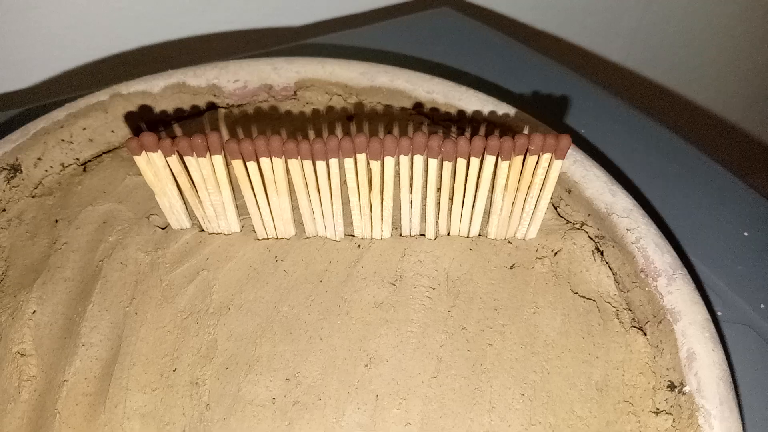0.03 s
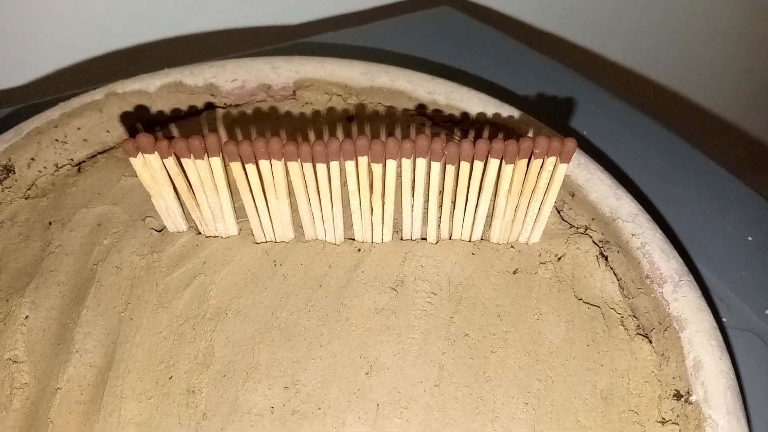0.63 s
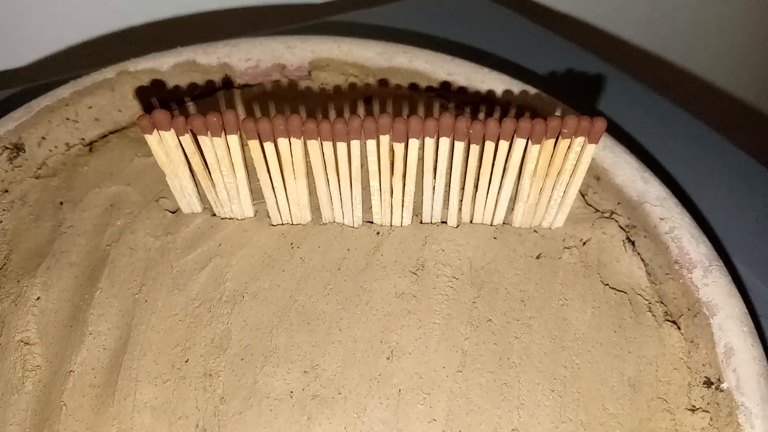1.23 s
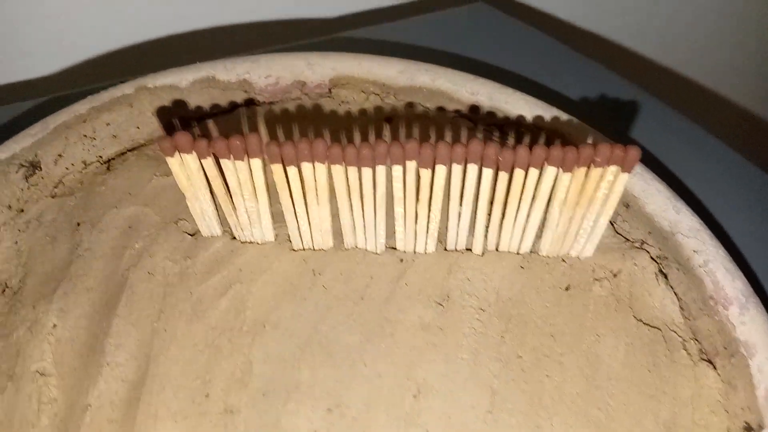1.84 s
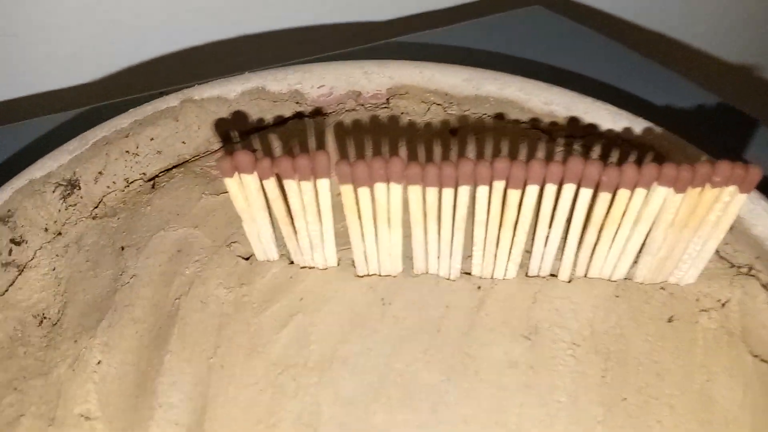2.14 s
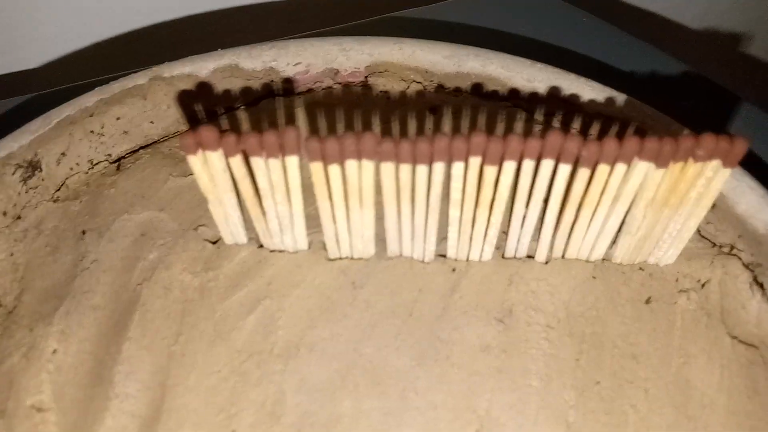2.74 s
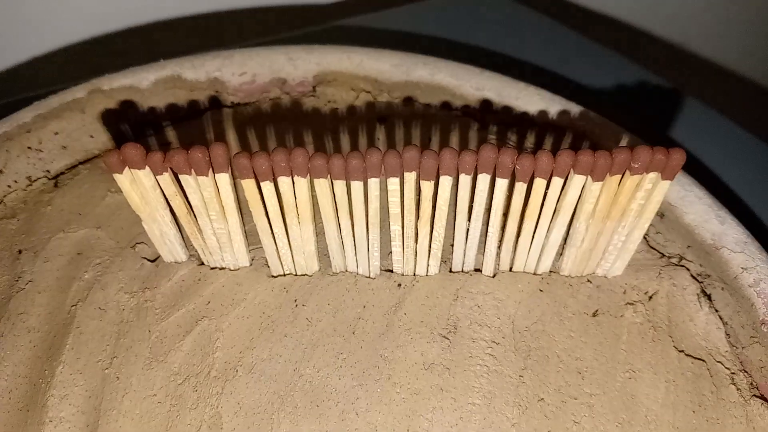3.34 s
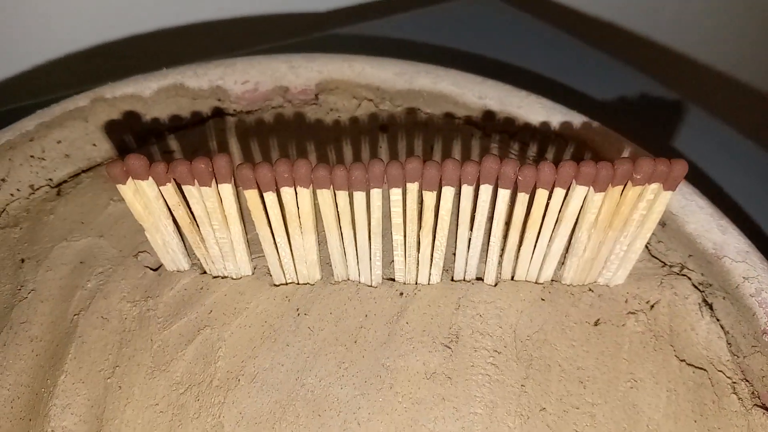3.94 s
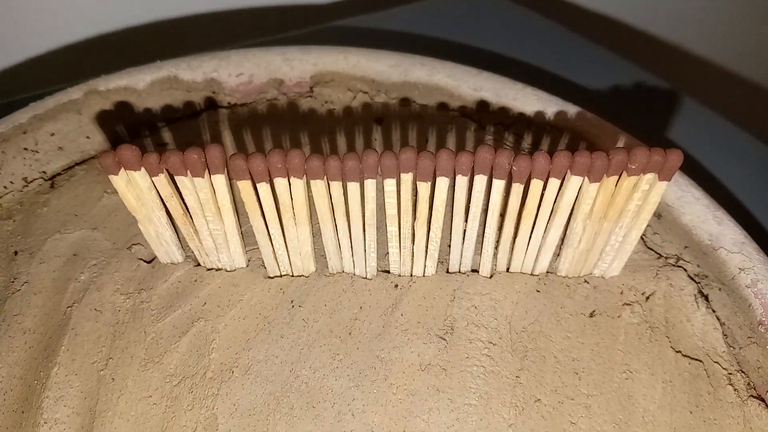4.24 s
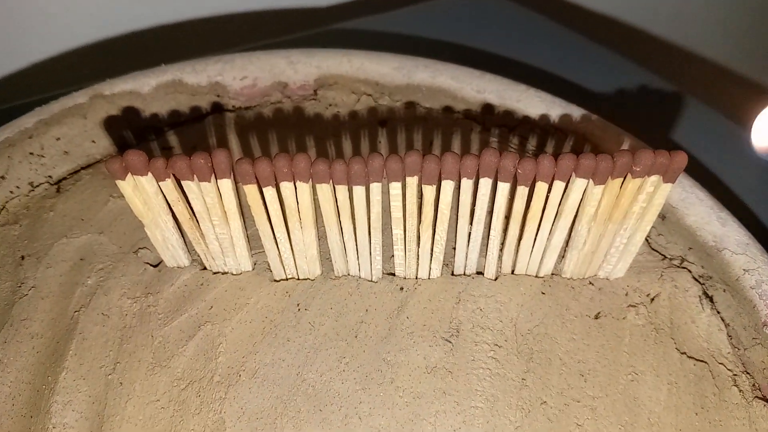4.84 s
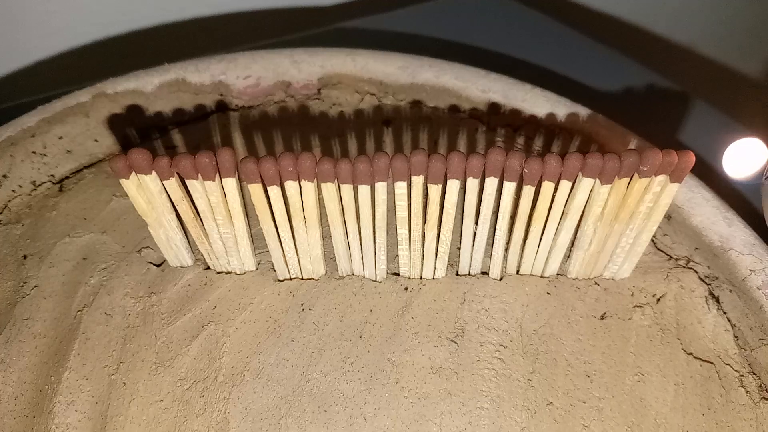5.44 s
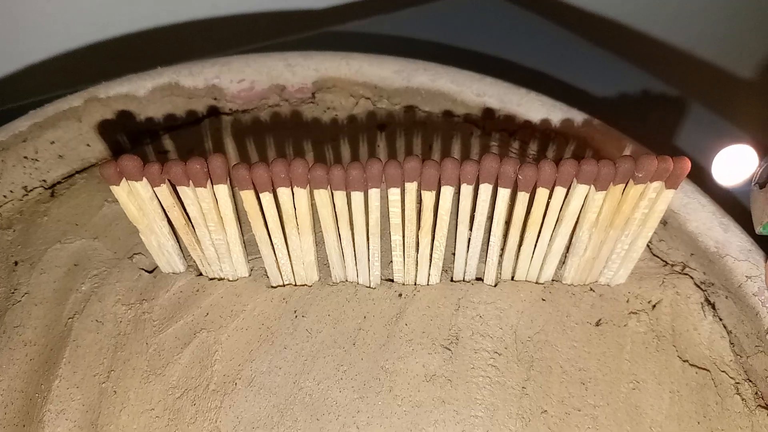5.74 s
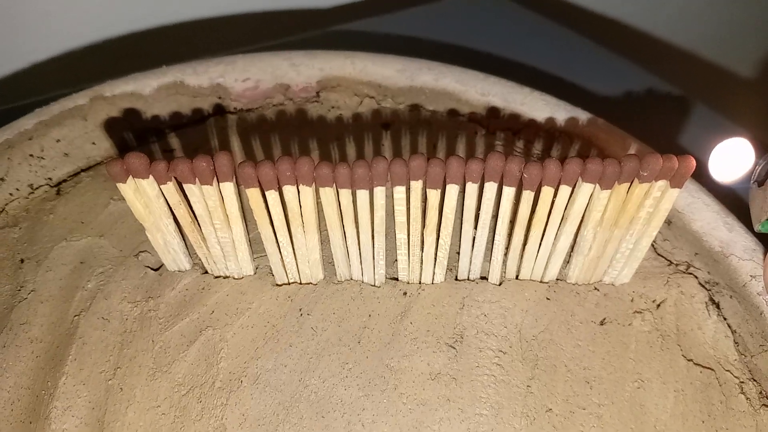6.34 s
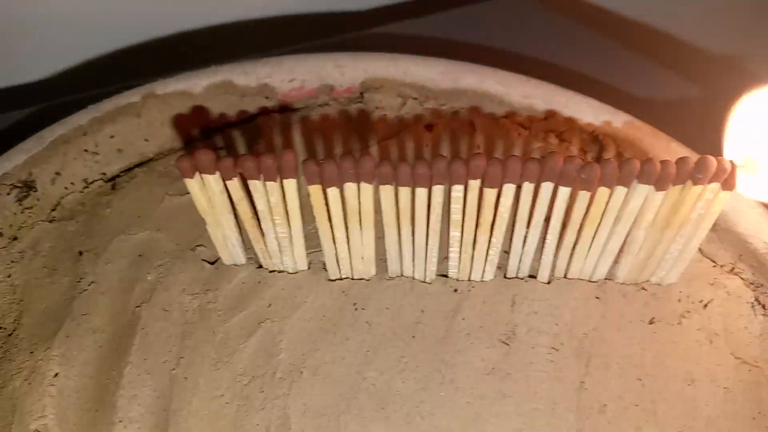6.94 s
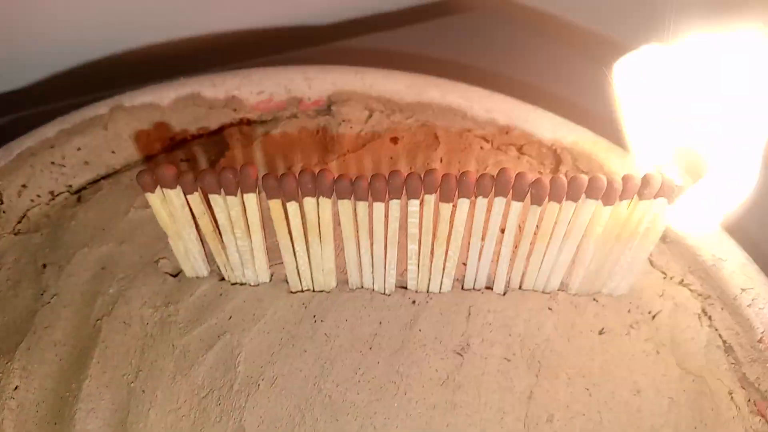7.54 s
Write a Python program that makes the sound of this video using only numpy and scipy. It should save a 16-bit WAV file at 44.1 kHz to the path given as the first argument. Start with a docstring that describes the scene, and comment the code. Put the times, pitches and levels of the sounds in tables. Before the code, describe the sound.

After faint handling ticks and one hard lighter click, match heads catch fire one after another, hissing, spitting and popping close by.

```python
"""A lighter lights a row of matches in a clay dish, close to a phone in a small hard room.
Over room hiss something hoots far off; fingers rub the lighter and its parts tick (from 0.4 s).
The button returns with a rattle (3.5 s), then the striker snaps so hard that the limiter ducks its echo.
More hoots follow. From 6.7 s the heads flare in turn: gas roars and whistles, the melting coating
fizzes and spits, and a few heads pop."""
import sys
import numpy as np
from scipy import signal
from scipy.fft import rfft, irfft, next_fast_len
from scipy.io import wavfile
from scipy.ndimage import uniform_filter1d, minimum_filter1d

SR = 44100
rng = np.random.default_rng(int(sys.argv[2]) if len(sys.argv) > 2 else 0)


def master(y):
    """Save y as 16-bit WAV."""
    cut = np.clip(np.atleast_2d(y).T, -1, 1)
    pcm = np.round(cut * 32767)  # scale
    wavfile.write(sys.argv[1], SR, pcm.astype(np.int16))


N = 334278
TIME = np.arange(N) / SR
RETURN_S, SNAP_S = 3.5245, 3.6743  # lighter: button return, striker

# crack of a match head: (frequency [Hz], level [dB])
CRACK_SPECTRUM = [(200, -19), (1000, -6.5), (2000, -10.5), (3000, -3), (4000, -11.5), (6200, -1),
                  (7000, -3), (9500, -0.5), (12000, -1.5), (16000, -8.5)]
# its ringing: (frequency [Hz], width [Hz], gain [dB])
CRACK_MODES = [(3040, 150, 7), (6240, 370, -2)]


def undb(db):
    """Decibels to gain."""
    return np.exp(np.asarray(db) * np.log(10) / 20)


def unit(x):
    """Scale to rms 1."""
    return x / np.sqrt(np.mean(x ** 2))


def at_hz(hz, rows, axis=1):
    """Table column, interpolated over log frequency."""
    rows = np.array(rows)
    return np.interp(np.log(hz + 1), np.log(rows[:, 0]), rows[:, axis])


def colour(x, spectrum, size=4096):
    """Minimum-phase filter from (frequency [Hz], gain [dB]) rows."""
    gain = undb(at_hz(np.fft.rfftfreq(size, 1 / SR), spectrum))
    cepstrum = irfft(np.log(gain))
    cepstrum[1:size // 2] *= 2
    cepstrum[size // 2 + 1:] = 0
    return signal.fftconvolve(x, irfft(np.exp(rfft(cepstrum))))[:len(x)]


def resonate(x, hz, width_hz):
    """One resonance, gain 1 at centre."""
    return signal.lfilter(*signal.iirpeak(hz, hz / width_hz, fs=SR), x)


def rung(x, modes):
    """Sound plus the resonances it excites."""
    return x + sum(undb(db) * resonate(x, hz, width_hz) for hz, width_hz, db in modes)


def walk(rate_hz):
    """Random drift, spread near 1."""
    steps = rng.standard_normal(8192)
    return np.sqrt(3 / 2) * np.interp(TIME * rate_hz, np.arange(len(steps)), steps)


def fall(t, t60_s):
    """Exponential decay; t60 floored at 1 ms."""
    return np.exp(-np.log(1000) * t / max(t60_s, 1e-3))


def swell(peak_s, rise_s, fall_s):
    """Gaussian rise to 1 and fall."""
    t = TIME - peak_s
    return np.exp(-(t / np.where(t < 0, rise_s, fall_s)) ** 2)


def swells(rows):
    """Power sum of swells: (peak [s], level [dB], rise [s], fall [s])."""
    return np.sqrt(sum((undb(db) * swell(s, rise_s, fall_s)) ** 2 for s, db, rise_s, fall_s in rows))


def add(out, start_s, x):
    """Mix x into out."""
    i = int(start_s * SR)
    out[i:i + len(x)] += x[:N - i]


def grains(rate_hz, spread_db):
    """Random impulses, a few much larger than the rest."""
    sizes = undb(spread_db * np.minimum(rng.exponential(size=N), 5)) * rng.choice([-1, 1], N)
    return unit(sizes * (rng.random(N) < rate_hz / SR))


def burst(spectrum, t60_s, modes=(), rise_s=0.00098, size=4096):
    """Short crack, whitened then coloured; rms 1 over its loudest 3 ms."""
    t = TIME[:size]
    envelope = fall(t, t60_s) * np.clip(t / rise_s, 0, 1)
    bins = rfft(rng.standard_normal(size) * envelope)
    white = irfft(bins / abs(bins)) * np.sqrt(envelope)
    crack = rung(colour(white, spectrum), modes)
    return crack / np.sqrt(uniform_filter1d(crack ** 2, size=132).max())


def air(hiss_db=-68):
    """Quiet room: restless low rumble under smooth hiss."""
    # room noise: (frequency [Hz], level [dB])
    spectrum = [(25, -19), (50, -5.5), (105, 0), (300, -7), (600, -10), (1000, -14.5), (2000, -19),
                (3800, -23), (6000, -28.5), (8500, -35), (16000, -33.5)]
    rumble = unit(resonate(rng.standard_normal(N), 115, 50)) * undb(-80.5 + 2.2 * walk(9.8))
    hiss = unit(colour(rng.standard_normal(N), spectrum)) * undb(hiss_db + 0.2 * walk(2.885))
    return hiss + rumble


def hoots(droop_hz_per_s=150, waver_depth=0.0306):
    """Far wavering notes, drooping in pitch, blurred by echoes on the way."""
    # hoots: (peak [s], pitch [Hz], level [dB], rise and fall [s])
    notes = [(.16, 614, -66, 0.12), (.38, 609, -69, .04), (4.43, 578, -66, .06), (4.59, 597, -58, 0.035),
             (4.67, 608, -61, 0.021), (4.775, 652.5, -58, 0.032), (4.99, 582, -62, .045)]
    tone, waver = 0, 1 + waver_depth * walk(60)
    for s, pitch_hz, db, span_s in notes:
        hz = (pitch_hz - droop_hz_per_s * (TIME - s)) * waver
        tone = tone + np.sin(2 * np.pi * np.cumsum(hz) / SR) * undb(db) * swell(s, span_s, span_s)
    echo = rng.standard_normal(SR) * fall(TIME[:SR], t60_s=0.66)
    return tone + undb(-0.5) * signal.fftconvolve(tone, echo / np.linalg.norm(echo))[:N]


def fingers():
    """Skin slides in tiny slips, louder as each stroke speeds up."""
    # skin friction: (frequency [Hz], level [dB])
    skin = [(700, -14), (2000, -6), (3500, -5), (6000, -4), (10000, 2.5), (12500, -1.5), (16000, -8.5)]
    # finger strokes: (fastest at [s], level [dB], rise [s], fall [s])
    strokes = [(.40, -69, .11, 0.12), (.6, -60.5, 0.13, 0.13), (1.19, -73.5, 0.086, 0.098),
               (1.45, -73, .13, 0.064), (1.73, -75, 0.078, 0.064), (2.03, -71.5, 0.066, 0.035),
               (2.27, -63, 0.19, 0.047)]
    slips = grains(rate_hz=26000, spread_db=3.5) * undb(walk(44.8))
    return unit(colour(slips, skin)) * swells(strokes)


def click(tick_db, body_db, t60_s, tilt_db_per_oct, ring_hz, ring_width_hz=260, ring_db=8):
    """One contact: ringing tick of the struck part plus the duller case."""
    # contact tick: (frequency [Hz], level [dB])
    tick_spectrum = [(1500, -23), (2900, -5), (3800, -8.5), (5500, -6), (6600, 0.5), (7300, -1), (9500, -1),
                     (11200, -3.5), (12500, -10), (16000, -12.5)]
    # lighter case: (frequency [Hz], level [dB])
    body_spectrum = [(50, -17.5), (170, -3), (700, -2.5), (1600, 2), (2900, -4.5), (4500, -11), (8000, -31)]
    # case ringing: (frequency [Hz], width [Hz], gain [dB])
    case_modes = [(1850, 150.2, 3), (2176, 110, 6), (2900, 210, 0), (5400, 200, 3)]
    tilted = [(hz, db + tilt_db_per_oct * np.log2(hz)) for hz, db in tick_spectrum]
    tick = burst(tilted, t60_s, [(ring_hz, ring_width_hz, ring_db)])
    body = burst(body_spectrum, t60_s, case_modes)
    return undb(tick_db - 1.5) * tick + undb(body_db) * body


def clicks(bounces=4, gap_s=.0115, loss_db=5):
    """Handling clicks and the dying rattle of the returning button."""
    # handling: (time [s], tick [dB], body [dB], t60 [s], tick tilt [dB/oct], ring [Hz])
    contacts = [(0.4512, -47.5, -68, 0.022, -3, 9020), (0.584, -44, -55, 0.053, -3.5, 3990),
                (0.823, -56, -61, 0.025, -2, 8900), (0.8290, -54, -61, 0.023, -1.5, 8950),
                (0.9392, -51.5, -65, 0.016, -2.5, 8460), (3.276, -60, -69, 0.014, -4, 5890),
                (3.3139, -54, -66, .02, -5.5, 6196), (3.3717, -38, -63, 0.056, 1, 6150),
                (3.3769, -33, -58, .018, 2, 6850), (3.3894, -42.5, -62, .025, -1, 3000),
                (3.523, -43.5, -42.5, 0.029, -1, 15000), (3.65, -56.5, -65, 0.015, -0.5, 8600),
                (4.0865, -65.5, -62, 0.021, -4, 5860), (4.2005, -61, -61, 0.023, -6, 9160),
                (4.2859, -60, -61.5, 0.029, -1, 9150), (5.6650, -45, -69, 0.02, 0.5, 10900)]
    # first bounce: (tick [dB], body [dB], t60 before the floor [s], tick tilt [dB/oct], ring [Hz])
    bounce = (-52, -49.5, -0.02, -4, 5500)
    out = np.zeros(N)
    for s, *contact in contacts:
        add(out, s, click(*contact))
    for k in range(bounces):
        add(out, RETURN_S + (k + 1) * gap_s, undb(-k * loss_db) * click(*bounce))
    return out


def lighter(return_db=-28.5, snap_db=-3.5):
    """The button returns with a soft knock; the spring-loaded striker snaps with a hard one."""
    # lighter knocking in the hand: (frequency [Hz], level [dB], t60 [s])
    knock_modes = [(104.9, -13.5, 0.028), (180.3, -16.5, 0.022), (329.5, -22, .02), (122.4, -38, 0.5)]
    # striker snap: (frequency [Hz], level [dB])
    striker = [(60, -16), (200, -12), (500, -14), (1000, -9), (1600, -4), (2100, -6), (2700, -2),
               (3800, -11), (5200, -6), (6100, 3), (6900, -9.5), (7600, -5.5), (9300, 0), (12000, -8),
               (16000, -18.5)]
    t = TIME[:SR]
    knock = sum(undb(db) * np.cos(2 * np.pi * hz * t) * fall(t, t60_s) for hz, db, t60_s in knock_modes)
    knock = signal.lfilter(*signal.butter(2, 420, fs=SR), knock)  # keeps only the dull, low thud
    out = np.zeros(N)
    add(out, RETURN_S, undb(return_db) * knock)
    add(out, SNAP_S, undb(snap_db) * burst(striker, t60_s=0.0089))
    add(out, SNAP_S, knock)
    return out


def gas(age_s, flow, roar_db=-44.5, sag_db_per_s=10, jet_rest_db=-56.5):
    """Gas rushes from the heads: a sinking roar and a faint whistle, both swelling with the flow."""
    # gas roar: (frequency [Hz], level [dB])
    spectrum = [(29, -52), (50, -33.5), (113, -6.5), (189, -8.5), (309, -1), (344, -4.5), (384, -7.5),
                (669, -6), (733, -9), (983, 3), (1150, -7.5), (1450, -2.5), (1710, -13), (2000, -8.5),
                (2600, -34), (4400, -120)]
    roar = unit(colour(rng.standard_normal(N), spectrum))
    roar *= np.hypot(undb(roar_db - sag_db_per_s * age_s), undb(-2) * flow)
    jet = unit(resonate(resonate(rng.standard_normal(N), 2270, 480), 2390, 360))
    return roar + jet * np.hypot(undb(jet_rest_db), flow)


def swirl(x, tilt_db_per_oct, depth_db, count=24):
    """Narrow bands swell and sink independently around a common tilt."""
    size = next_fast_len(N)
    hz, spectrum = np.fft.rfftfreq(size, 1 / SR), rfft(x, size)
    centres_hz = np.geomspace(2400, 14000, count)
    place = np.interp(hz, centres_hz, np.arange(count))
    out = np.zeros(N)
    for k, centre_hz in enumerate(centres_hz):
        band = irfft(spectrum * np.clip(1 - abs(place - k), 0, 1), size)[:N]
        out += band * undb(tilt_db_per_oct * np.log2(centre_hz / 7500) + depth_db * walk(20))
    return out


def coating(age_s, melt, grow_s=0.09, simmer_db=-53.5, spit_db=-59):
    """The coating fizzes, duller as it melts, and spits in tiny cracks."""
    # fizz: (frequency [Hz], level [dB])
    spectrum = [(1500, -25), (2600, -14), (3030, -2), (3400, -3.5), (3900, 2), (5000, -1.5), (6100, 2),
                (7200, 5), (8500, -2), (11000, 3.5), (12500, -8), (16000, -11)]
    grown = 1 - np.exp(-age_s / grow_s)
    fizz = unit(colour(grains(rate_hz=7000, spread_db=2.5), spectrum))
    fizz = swirl(fizz, tilt_db_per_oct=2.1 - 4.5 * age_s, depth_db=2.5)
    fizz *= np.hypot(undb(simmer_db) * grown, melt) * undb(1.37 * walk(170))
    cracks = colour(grains(rate_hz=90, spread_db=2.1), CRACK_SPECTRUM)
    return fizz + unit(rung(cracks, CRACK_MODES)) * undb(spit_db) * grown


def dish(x, lag_s=.0016, drift=0.069, gain=0.22):
    """Add the clay dish's reflection; its delay drifts as flame and hand move."""
    return x + gain * np.interp(TIME - lag_s * (1 + drift * walk(4)), TIME, x)


def flare(light_s=6.695, catch_s=0.055):
    """Heads catch in turn; gas and coating share one uneven burn."""
    # match heads: (peak [s], fizz [dB], jet whistle [dB], rise and fall [s])
    heads = [(6.77, -47.5, -68, 0.066), (6.866, -45, -52, 0.083), (6.999, -46.5, -56, 0.058),
             (7.091, -45, -51.5, 0.045), (7.175, -47, -51.5, 0.025), (7.245, -46.5, -50, 0.027),
             (7.31, -53, -57, 0.037), (7.405, -50.5, -55, .03), (7.475, -48.5, -45, 0.054),
             (7.555, -55, -46.5, 0.039)]
    age_s = np.maximum(TIME - light_s, 0)
    caught = np.sqrt(1 - np.exp(-age_s / catch_s))
    melt = swells([(s, fizz_db, span_s, span_s) for s, fizz_db, _, span_s in heads])
    flow = swells([(s, jet_db, span_s, span_s) for s, _, jet_db, span_s in heads])
    sputter = undb(1.13 * walk(55))
    return dish(gas(age_s, flow) + coating(age_s, melt)) * sputter * caught


def pops():
    """A few heads burst with a short ringing crack."""
    # bursting heads: (time [s], level [dB], t60 [s], ring [Hz])
    cracks = [(6.8869, -19, 0.018, 12700), (6.907, -36, 0.015, 5900), (7.1628, -41, .012, 7100),
              (7.308, -40.5, 0.0084, 10400), (7.4776, -41.5, 0.013, 5800)]
    out = np.zeros(N)
    for s, db, t60_s, ring_hz in cracks:
        add(out, s, undb(db) * burst(CRACK_SPECTRUM, t60_s, CRACK_MODES + [(ring_hz, 350, 7)]))
    return out


def room(x, size=32768, rise_s=.003):
    """Diffuse echo: octaves of noise, each dying at its own rate."""
    # room echo: (band [Hz], level [dB], t60 [s])
    bands = [(101.2, -20, 0.87), (400, -20.5, 0.8), (1000.6, -24, 0.48), (2600, -8.5, 0.51),
             (6100, -9.5, 0.49), (10000, -12.5, 0.24), (15000, -19, .26)]
    t, hz = TIME[:size], np.fft.rfftfreq(size, 1 / SR)
    noise, echo = rfft(rng.standard_normal(size)), 0
    for centre_hz in 2.0 ** np.arange(6, 15):
        share = np.clip(1 - abs(np.log2((hz + 1) / centre_hz)), 0, 1)
        decay = fall(t, at_hz(centre_hz, bands, axis=2)) * np.clip(t / rise_s, 0, 1)
        octave = undb(at_hz(centre_hz, bands)) * irfft(noise * share)
        echo = echo + octave * decay / np.linalg.norm(decay)
    return signal.fftconvolve(x, echo)[:N]


def scene():
    """Near sounds with their echo, over hoots and room noise."""
    near = clicks() + lighter() + fingers() + flare() + pops()
    return (near + room(near) + hoots() + air())[None]


def limit(x, ceiling_db=-5, release_db_per_s=210, hold_s=.012):
    """Limiter: ducks just ahead of a peak, holds, recovers at a steady rate."""
    over_db = np.maximum(20 * np.log10(abs(x) + 1e-9) - ceiling_db, 0)
    ramp_db = release_db_per_s * TIME
    duck_db = np.maximum.accumulate(over_db + ramp_db) - ramp_db
    duck_db = np.maximum(duck_db, np.interp(TIME - hold_s, TIME, duck_db))
    return x * uniform_filter1d(minimum_filter1d(undb(-duck_db), size=65), size=65)


def record(dry, low_hz=40, top_hz=15800, start_s=.122, fade_s=0.25):
    """Phone: bass cut, treble colouring, fade-in, limiter, top cut."""
    # microphone port: (frequency [Hz], gain [dB])
    port = [(3900, 0.5), (4400, -10.5), (5100, -1), (6100, 7), (6600, 4.5), (7250, 2.5), (8100, -3),
            (9300, 3), (11000, 0.5), (12000, -3.5), (13800, -10), (15000, -4), (15800, -6)]
    fade_in = np.clip((TIME - start_s) / fade_s, 0, 1)
    x = signal.sosfilt(signal.butter(3, low_hz, "high", fs=SR, output="sos"), dry[0])
    x = limit(colour(x, port) * fade_in)
    return signal.sosfilt(signal.ellip(10, .2, 70, top_hz, fs=SR, output="sos"), x)[None]


dry = scene()
out = record(dry)
master(out)
```